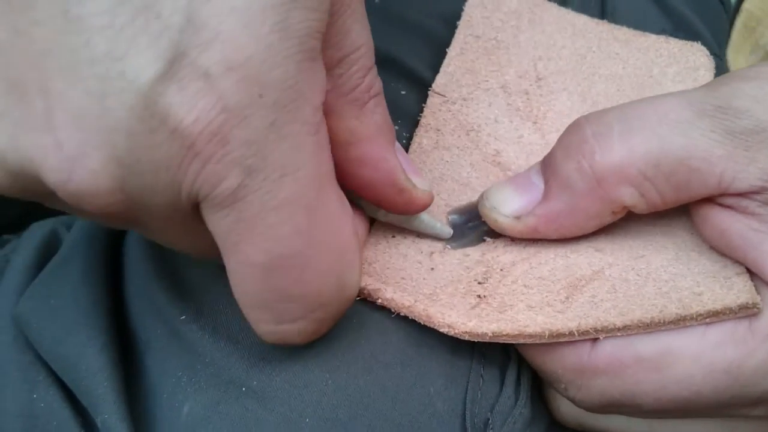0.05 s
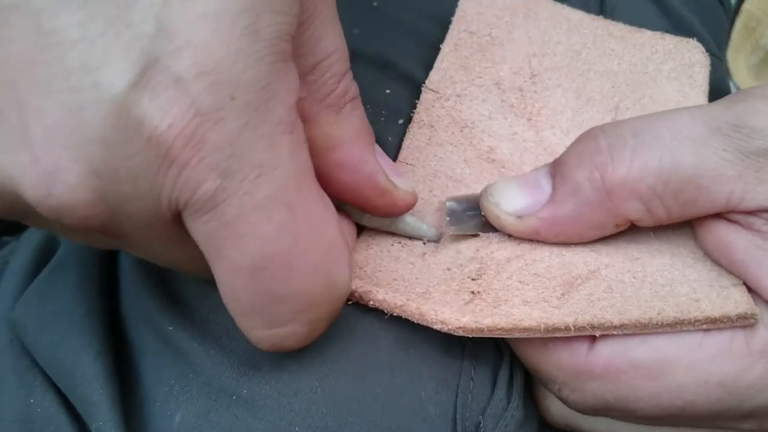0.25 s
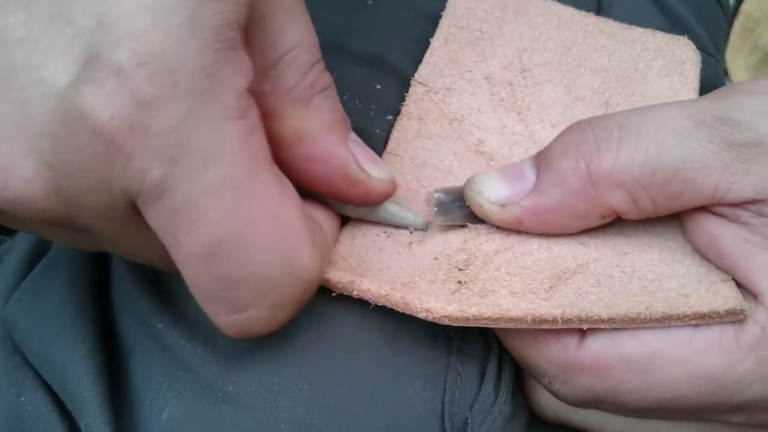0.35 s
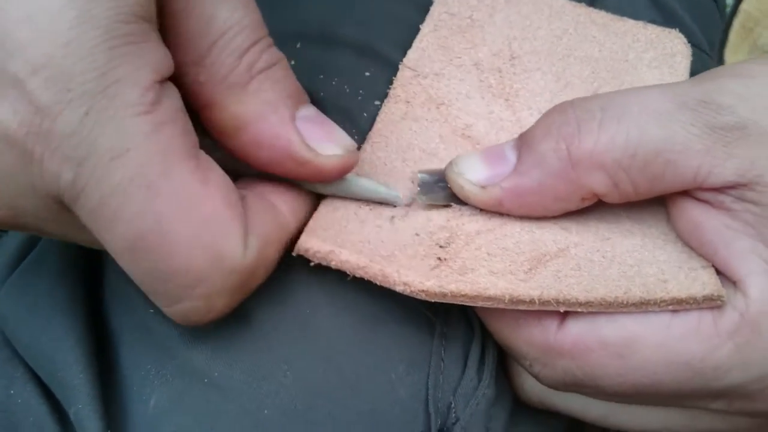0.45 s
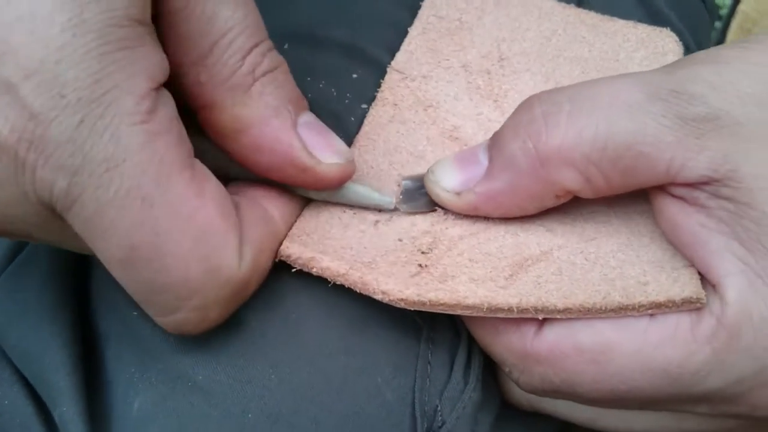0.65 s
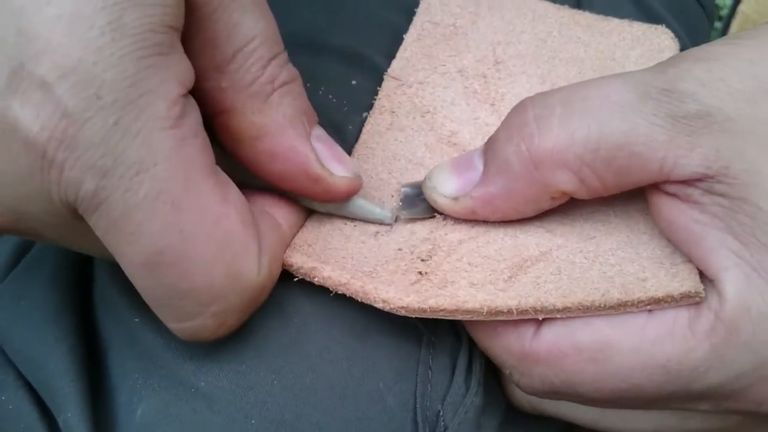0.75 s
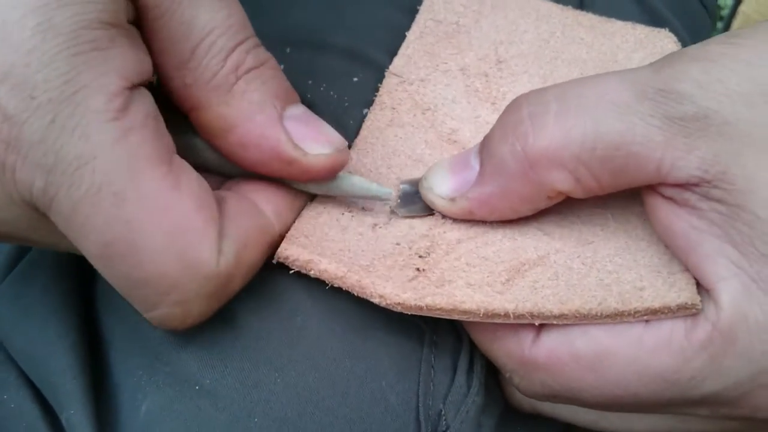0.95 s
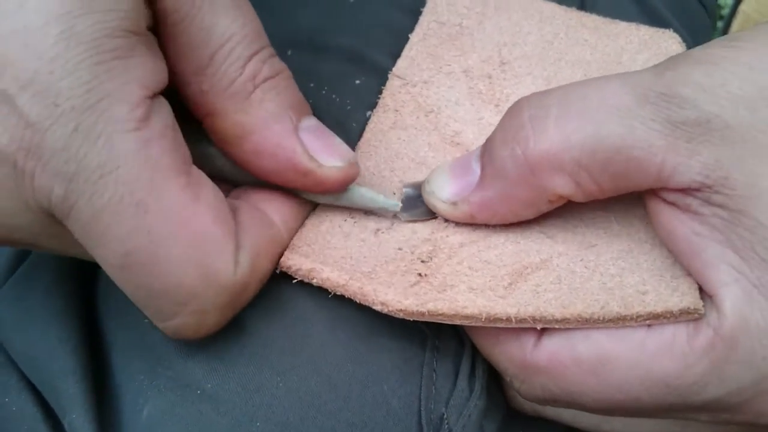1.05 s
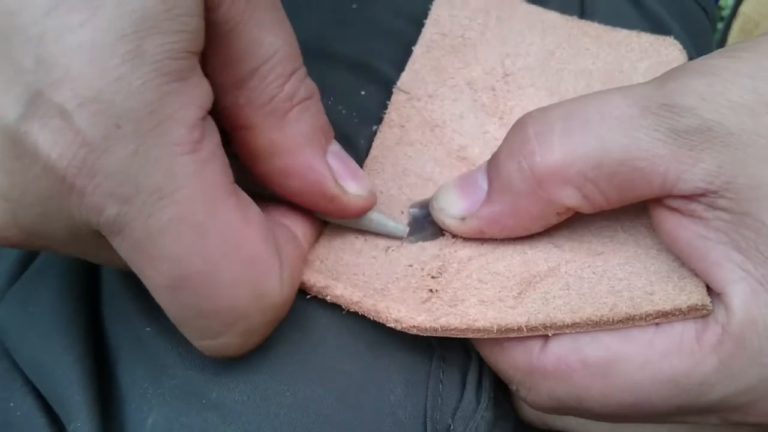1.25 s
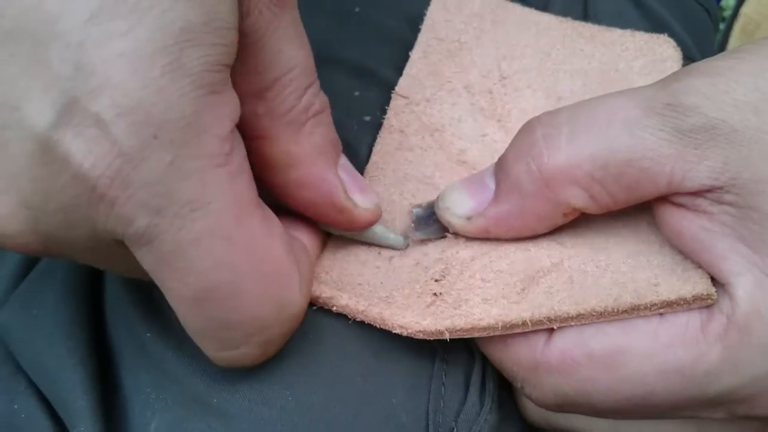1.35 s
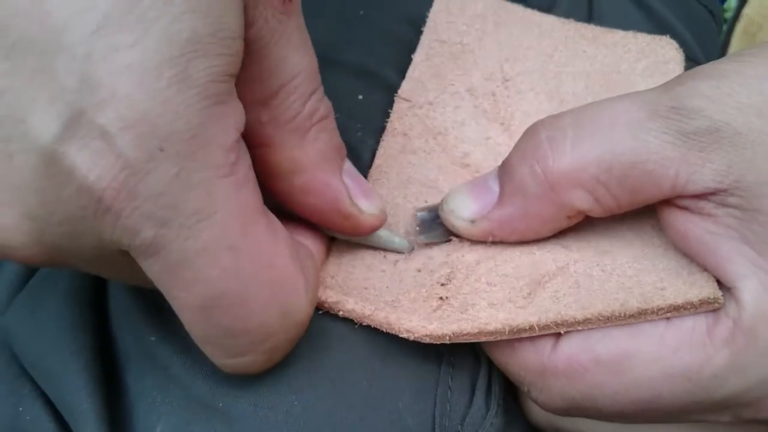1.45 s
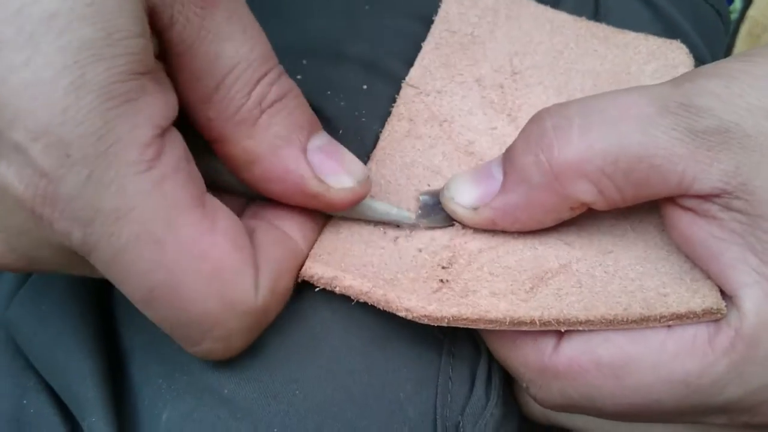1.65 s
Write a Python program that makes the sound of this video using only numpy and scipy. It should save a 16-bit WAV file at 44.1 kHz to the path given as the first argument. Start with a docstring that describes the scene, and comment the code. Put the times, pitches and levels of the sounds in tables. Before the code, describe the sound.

Stone flakes snap off under a hand tool, close to the microphone in a quiet outdoor spot. A loud, bright crack is followed by small clicks and soft scraping on stone and leather, then several more crisp cracks.

```python
"""Sharp cracks with a very short ring: a pointed tool presses small flakes off a stone chip on a leather pad.
The work is close, and the loudest snaps overload the recorder.
Between them come light ticks, two dull knocks and a faint rubbing of tool, stone and leather.
Quiet outdoor air and diffuse reflections lie behind."""
import sys
import numpy as np
from scipy import signal
from scipy.fft import rfft, irfft, next_fast_len
from scipy.io import wavfile
from scipy.ndimage import uniform_filter1d, map_coordinates

SR = 44100
rng = np.random.default_rng(int(sys.argv[2]) if len(sys.argv) > 2 else 0)


def bounce(signal):
    """Save signal as a 16-bit WAV file at the path given by the first command-line argument."""
    frames = np.transpose(np.atleast_2d(signal))
    limited = np.clip(frames, -1, 1)
    pcm = np.round(limited * 32767).astype(np.int16)
    wavfile.write(sys.argv[1], SR, pcm)


N = 74970

# friction spectrum (frequency [Hz], density [dB])
FRICTION_SPECTRUM = [(100, -29), (500, -14.5), (1600, -14.5), (2700, -7.5), (3300, -8.5), (4200, -6),
                     (5100, 0), (6000, -6.5), (7500, -12.5), (10000, -16), (13000, -16.5), (15000, -13),
                     (15600, -18), (16000, -53.5)]


def amp(db):
    """Decibels to gain."""
    return 10 ** (np.asarray(db) / 20)


def unit(x):
    """Scale to rms 1."""
    return x / np.sqrt(np.mean(x ** 2) + 1e-20)


def gain_at(spectrum, hz):
    """Gain of (frequency [Hz], level [dB]) points, interpolated over log frequency."""
    points_hz, points_db = np.transpose(spectrum)
    return amp(np.interp(np.log(hz + 1), np.log(points_hz + 1), points_db))


def filtered(x, response):
    """Apply a frequency response by zero-padded FFT."""
    size = next_fast_len(x.shape[-1] + 8192)
    hz = np.fft.rfftfreq(size, 1 / SR)
    return irfft(rfft(x, size) * response(hz), size)[..., :x.shape[-1]]


def causal(gain):
    """Minimum-phase response: rings only after it is struck."""
    cepstrum = irfft(np.log(gain + 1e-9))
    half = cepstrum.shape[-1] // 2
    fold = np.r_[1, np.full(half - 1, 2), 1, np.zeros(half - 1)]
    return np.exp(rfft(cepstrum * fold))


def noise(spectrum, size=N):
    """Coloured noise, rms 1, independent per channel."""
    return unit(filtered(rng.standard_normal((2, size)), lambda hz: gain_at(spectrum, hz)))


def band_noise(centre_hz, width_hz, size):
    """Stereo noise through one resonance, rms 1."""
    def resonance(hz):
        return 1j * hz * width_hz / (centre_hz ** 2 - hz ** 2 + 1j * hz * width_hz)
    return unit(filtered(rng.standard_normal((2, size)), resonance))


def wobble(knots_per_s, size=N):
    """Smooth random curve."""
    position = np.arange(size) * knots_per_s / SR
    return map_coordinates(rng.standard_normal(size // 8), [position], mode="wrap")


def envelope(t, rise_s, t60_s):
    """Quick rise, exponential decay."""
    return (1 - np.exp(-t / rise_s)) * np.exp(-np.log(1000) * t / t60_s)


def add(track, start_s, sound):
    """Mix a sound into the track."""
    part = track[:, round(start_s * SR):][:, :sound.shape[-1]]
    part += sound[:, :part.shape[-1]]


def air():
    """Quiet, steady outdoor air."""
    # (frequency [Hz], density [dB])
    air_spectrum = [(15, -25), (25, 6.5), (44, -10), (83, -0.5), (309, -15.5), (450, -9.5), (604, -11.5),
                    (673, -5), (1090, 1), (2240, -10.5), (3010, -7), (4260, -11.5), (5010, -1.5),
                    (7680, -15), (15000, -11)]
    return amp(-57) * noise(air_spectrum)


def reflections(x, t60_s):
    """Diffuse reflections: a hiss that takes up the sound's energy and dies away."""
    # outdoor tail (frequency [Hz], density [dB])
    tail_spectrum = [(200, -24), (1200, -23.5), (2500, -15.5), (3300, -10), (4000, -1), (5200, 3),
                     (6300, -11.5), (9000, -15), (14000, -11), (15500, -14.5), (16000, -25)]
    decay = envelope(np.arange(N) / SR, 0.0045, t60_s) ** 2
    energy = signal.fftconvolve(np.mean(x ** 2, axis=0), decay / decay.sum())[:N]
    return np.sqrt(abs(energy)) * noise(tail_spectrum)


def rubbing():
    """Tool, stone and leather rub with a fine grain; the tool slips once, at the first knock."""
    # friction contour (time [s], relative level [dB])
    contour = [(0, -56.5), (.14, -62.5), (.3, -62), (.39, -61.5), (.52, -56.5), (.62, -67.5), (.72, -56.5),
               (.8, -60), (.91, -50.5), (1.08, -54.5), (1.25, -56.5), (1.46, -58.5), (1.62, -68),
               (1.7, -59)]
    offset_db, grain_db = 3, 2
    slip_s, slip_db, slip_width_s = 0.3544, -38, 0.0095
    t = np.arange(N) / SR
    level = amp(np.interp(t, *np.transpose(contour)) + offset_db)
    slip = amp(slip_db) * np.exp(-abs(t - slip_s) / slip_width_s)
    grain = amp(grain_db * wobble(knots_per_s=400))
    return (level + slip) * unit(grain * noise(FRICTION_SPECTRUM))


def scratches():
    """The point scratches the stone: brief narrow bands of noise."""
    # (time [s], level [dB], centre [Hz])
    strokes = [(0.257, -37.5, 5230), (0.896, -40, 2900), (0.9, -43, 5040), (0.933, -43.5, 2670),
               (0.985, -38, 3970), (1.011, -40.5, 5300)]
    out, t = np.zeros((2, N)), np.arange(4096) / SR
    shape = envelope(t, rise_s=0.00093, t60_s=0.026)
    for start_s, db, hz in strokes:
        add(out, start_s, amp(db) * band_noise(hz, width_hz=700, size=len(t)) * shape)
    return out


def ring(t, hz, t60_s):
    """Damped mode, roughened by contact chatter; reaches the right microphone later."""
    lag_s = np.array([[0], [0.00006]])
    chatter_rad = 0.39 * np.array([wobble(knots_per_s=594, size=len(t)) for _ in range(2)])
    return np.sin(2 * np.pi * hz * (t - lag_s) + chatter_rad) * envelope(t, 0.00066, t60_s)


def knocks():
    """Soft contacts with a little hiss; they ring lower and longer than the snaps."""
    # (time [s], level [dB])
    contacts = [(0.349, -39.5), (.6445, -46)]
    # knock resonances (frequency [Hz], relative level [dB], t60 [s])
    modes = [(445, -12, 0.092), (860, -11, 0.11), (1970, -5.5, 0.044), (2750, 1, 0.052), (3290, -10, 0.18),
             (4220, 2.5, 0.046), (4640, -5, .05), (4860, -1, 0.045)]
    out, t = np.zeros((2, N)), np.arange(8192) / SR
    for start_s, db in contacts:
        body = sum(amp(mode_db) * ring(t, hz, t60_s) for hz, mode_db, t60_s in modes)
        hiss = amp(-23) * noise(FRICTION_SPECTRUM, len(t)) * envelope(t, rise_s=0.0017, t60_s=0.067)
        add(out, start_s, amp(db) * (body + hiss))
    return out


def burst(t, spectrum, t60_s, stretch):
    """Sharp noise burst plus its scatter between the hands, flattened and then coloured."""
    rise_s, smoothing_hz = 0.00012, 300
    direct = envelope(t / stretch, rise_s, t60_s)
    scatter = amp(-20) * envelope(t / stretch, rise_s, t60_s=0.033)
    shape = direct + scatter
    bins = rfft(rng.standard_normal((2, len(t))) * shape)
    hz = np.fft.rfftfreq(len(t), 1 / SR)
    ripple = np.sqrt(abs(uniform_filter1d(abs(bins) ** 2, round(smoothing_hz / hz[1]))))
    coloured = irfft(bins * causal(gain_at(spectrum, hz) / ripple))
    return unit(coloured) * np.sqrt(np.mean(shape ** 2))


def snaps():
    """Each fracture gives a crack, a bright spray, a thud in the pad and two rings, the low one later."""
    # snaps and ticks (time [s], crack [dB], spray [dB], thud [dB], thud pitch [Hz], low ring [dB],
    # high ring [dB], high ring pitch [Hz], time stretch [ratio], left minus right [dB])
    fractures = [(0.2197, -1.5, 2.5, -14, 1084, 9, 12, 4991, 1.046, -3),
                 (0.2254, -22, -21.5, -53, 1300, -1, -14, 5230, 0.705, -2.5),
                 (0.438, -39, -36, -54.5, 1190, -60, -18, 5770, 0.5, -3.5),
                 (0.7381, -35, -40, -50.5, 1200, -40, -11.5, 4850, 0.6, 0.5),
                 (.7628, -13.5, -47, -34, 1320, -11, -4.5, 4510, 0.8, -1),
                 (0.7726, -26, -32, -68, 1200, -50, -44, 5000, 0.55, -4),
                 (1.1709, -50, -32, -57, 1200, -56, -41, 5330, 0.69, -4),
                 (1.2552, -15, -3, -47, 1210, -19, 1, 5440, 0.37, -1.5),
                 (1.3445, -12.5, -4.5, -29.5, 720, -9, -5.5, 4900, .7, -4),
                 (1.3481, -8.5, 1, -22, 686, -9, 5, 4997, 1.0, -1.5),
                 (1.4025, -28, -9, -42, 1490, -36, -20, 5630, 0.53, -6),
                 (1.4032, -3, -2, -18, 1460, -1, 5.5, 5340, 0.97, -0.5),
                 (1.4056, -9.5, -8.5, -28, 1500, -4.5, 8.5, 4715, 0.93, -1),
                 (1.4144, -26, -37, -44, 1200, -11.5, -1.5, 5370, 0.54, 5),
                 (1.6617, -42, -31, -62, 1220, -67, -26.5, 5300, 0.67, -3.5)]
    # (frequency [Hz], density [dB])
    crack_spectrum = [(100, -58), (700, -41.5), (1300, -26.5), (1850, -26), (2700, -7), (3200, -7),
                      (3900, 0.5), (5400, 3), (6500, -4.5), (7400, -17), (9000, -22), (16000, -20)]
    # (frequency [Hz], density [dB])
    spray_spectrum = [(1500, -35.5), (6000, -9), (8400, -2), (9800, -6.5), (11300, 0.5), (13000, -2),
                      (15000, 5.5), (15900, -7.5)]
    # pad thud spectrum (frequency / thud pitch [ratio], density [dB])
    thud_shape = [(.03, -3), (.15, -19.5), (.45, -17), (.75, -4), (1.05, 4.5), (1.4, -3), (2, -5.5),
                  (4, -16.5)]
    out, t = np.zeros((2, N)), np.arange(4096) / SR
    for fracture in fractures:
        start_s, crack_db, spray_db, thud_db, thud_hz, low_db, high_db, high_hz, stretch, pan_db = fracture
        thud_spectrum = [(ratio * thud_hz, db) for ratio, db in thud_shape]
        crack = amp(crack_db) * burst(t, crack_spectrum, 0.019, stretch)
        spray = amp(spray_db) * burst(t, spray_spectrum, 0.0061, stretch)
        thud = amp(thud_db) * burst(t, thud_spectrum, 0.012, stretch)
        high_ring = amp(high_db) * ring(t, high_hz, t60_s=0.0095 * stretch)
        low_ring = amp(low_db) * ring(t, hz=4013, t60_s=0.018 * stretch)
        pan = amp([[pan_db / 2], [-pan_db / 2]])
        add(out, start_s, pan * (crack + spray + thud + high_ring))
        add(out, start_s + 0.0019 * stretch, pan * low_ring)
    return out


def scene():
    """Work in the hands, reflections from body and surroundings, and the air."""
    work = snaps() + knocks()
    near = amp(-33) * reflections(work, t60_s=0.084)
    far = amp(-34) * reflections(work, t60_s=1)
    bed = rubbing() + scratches() + air()
    lean_right = amp([[-0.9], [0.9]])
    return work + (near + far + bed) * lean_right


def record(dry):
    """The recorder soft-clips the loudest snaps, thins the deep bass and limits the band."""
    hardness, low_cut_hz, top_hz = 2.6, 75, 15900
    clipped = dry / (1 + abs(dry) ** hardness) ** (1 / hardness)
    thinned = filtered(clipped, lambda hz: 1j * hz / (low_cut_hz + 1j * hz))
    return filtered(thinned, lambda hz: 1 / np.sqrt(1 + (hz / top_hz) ** 120))


dry = scene()
out = record(dry)
bounce(out)
```